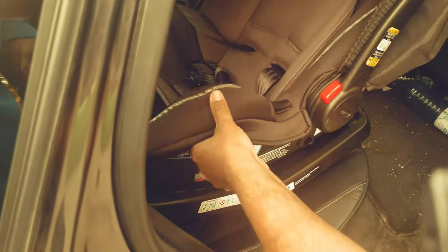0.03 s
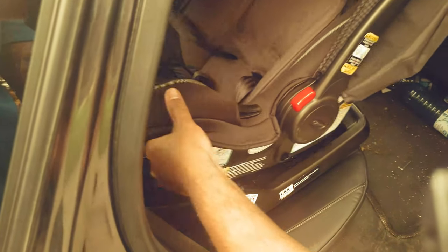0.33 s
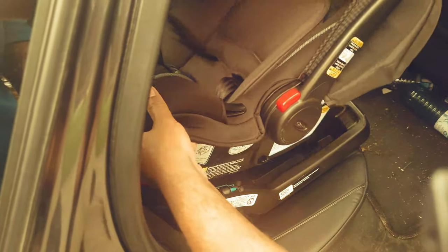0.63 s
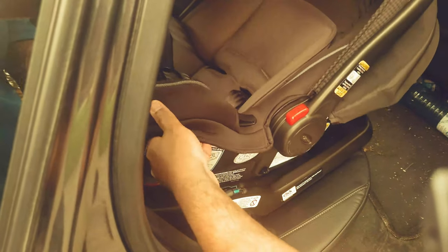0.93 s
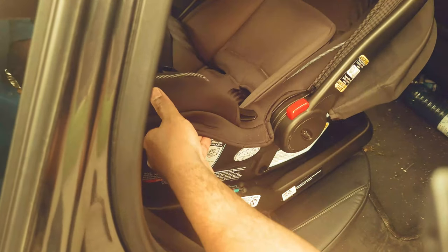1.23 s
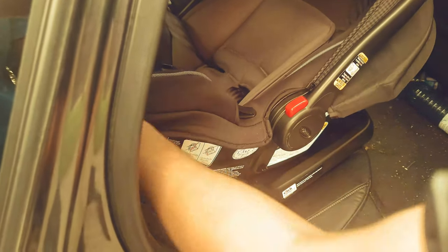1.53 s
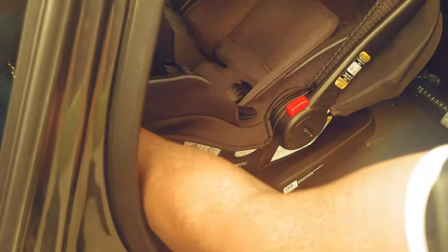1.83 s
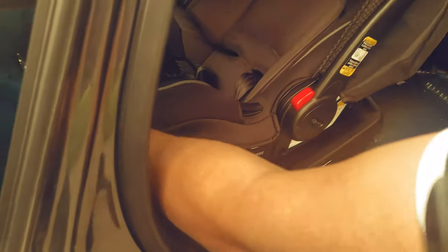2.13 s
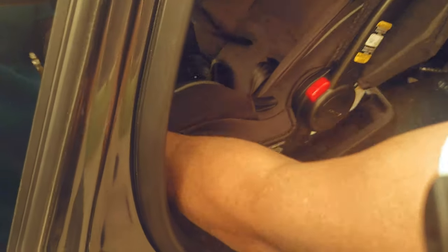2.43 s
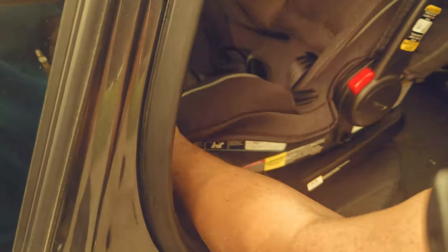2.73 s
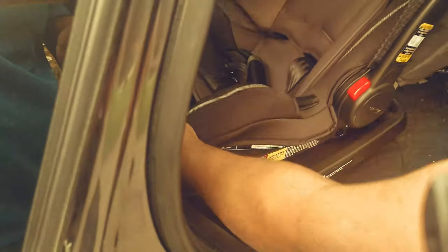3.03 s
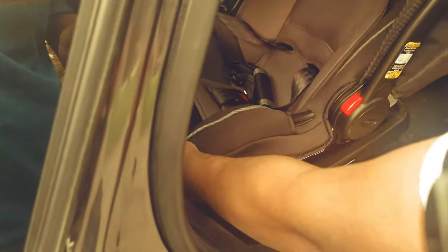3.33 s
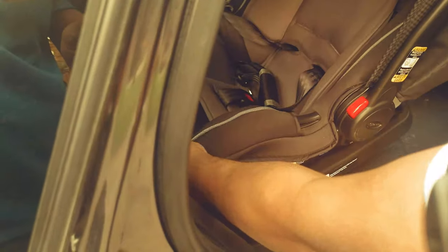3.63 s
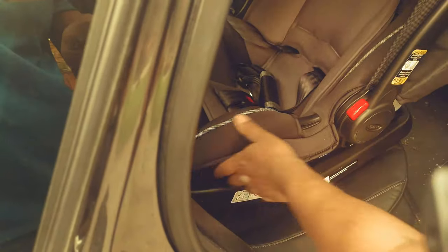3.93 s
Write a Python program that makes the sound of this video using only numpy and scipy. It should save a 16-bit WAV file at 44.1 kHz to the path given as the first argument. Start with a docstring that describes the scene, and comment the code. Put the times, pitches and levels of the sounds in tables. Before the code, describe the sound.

A plastic child seat is shoved about on its base close by in a parked car, knocking hollowly, rustling faintly, then clunking again and latching with a click. A low rumble, distant engine and faint birds come from outside.

```python
"""Child seat in a parked car

A plastic child seat is shoved about on its base, the car door open. Its hollow shell knocks,
scrapes and drops into place, a sprung latch snaps shut and fabric rustles; the cabin reflects it all.
Outside, over a low rumble, a distant engine drones, slowly rising in pitch.
A bird repeats a short song; farther birds whistle thinly."""
import sys
import numpy as np
from scipy import signal
from scipy.fft import rfft, irfft
from scipy.io import wavfile
from scipy.ndimage import uniform_filter1d

SR = 44100
rng = np.random.default_rng(int(sys.argv[2]) if len(sys.argv) > 2 else 0)


def to_wav(s):
    """Save 16-bit WAV."""
    ch = np.atleast_2d(s).T  # columns
    pcm = np.round(np.clip(ch, -1, 1) * 32767)  # PCM
    wavfile.write(sys.argv[1], SR, pcm.astype(np.int16))


N = 176400
T = np.arange(N) / SR

# Impact noise of shell and latch: f/Hz, relative density/dB
CRACK_SPECTRUM = [(300, -7), (900, 9.5), (2000, 14), (3300, 6.5), (5000, 3), (7500, 0), (9500, -7),
                  (15500, -12)]


def amp(db):
    """dB to gain."""
    return 10 ** (np.asarray(db) / 20)


def unit(x):
    """Scale to rms 1."""
    return x / np.sqrt(np.mean(x ** 2) + 1e-20)


def at_hz(points, hz):
    """Interpolate a table over log frequency."""
    f, value = np.transpose(points)
    return np.interp(np.log(hz + 1), np.log(f + 1), value)


def curve(points):
    """Interpolate a table over the scene's time."""
    return np.interp(T, *np.transpose(points))


def add(mix, start_s, sound):
    """Mix a sound in at start_s."""
    part = mix[:, max(round(start_s * SR), 0):][:, :sound.shape[-1]]
    part += sound[..., :part.shape[1]]


def colour(x, spectrum):
    """Shape the spectrum; rms 1."""
    size = x.shape[-1]
    gain = amp(at_hz(spectrum, np.fft.rfftfreq(size, 1 / SR)))
    return unit(irfft(rfft(x) * gain, size))


def drift(rate_hz, size):
    """Smooth random wander, rms about 1."""
    count = N if size > SR // 2 else SR // 2
    lowpass = np.exp(-(np.fft.rfftfreq(count, 1 / SR) / rate_hz) ** 2)
    return unit(irfft(rfft(rng.standard_normal(count)) * lowpass, count))[:size]


def pair(a, b, coherence, lag_s=0):
    """Two unrelated signals to stereo of given coherence; left lags."""
    hz = np.fft.rfftfreq(len(a), 1 / SR)
    same = np.clip(at_hz(coherence, hz), -1, 1)
    a, b = rfft(a), rfft(b)
    left = a * np.exp(-2j * np.pi * hz * lag_s)
    right = same * a + np.sqrt(1 - same ** 2) * b
    return irfft(np.array([left, right]))


def echoes(x, decay_times):
    """Diffuse reflections, separate per ear; decay_times: f/Hz, t60/s."""
    taps = rng.standard_normal((2, SR // 2)) * (T[:SR // 2] > .002)
    hz, t, bands = signal.stft(taps, SR, nperseg=128)
    fade = amp(-60 * t / at_hz(decay_times, hz)[:, None])
    tail = signal.istft(bands * fade, SR, nperseg=128)[1]
    return signal.fftconvolve(x, tail / np.linalg.norm(tail[0]), axes=1)[:, :N]


def decay(t, t60_s):
    """Exponential fall, 60 dB in t60_s."""
    return np.exp(-np.log(1000) * t / t60_s)


def ring(hz, t60_s, rise_s, lag_s=0):
    """One struck mode."""
    t = np.maximum(T[:SR // 4] - lag_s, 0)
    return np.sin(2 * np.pi * hz * t) * decay(t, t60_s) * (1 - np.exp(-t / rise_s))


def near_noise(spectrum, size):
    """Coloured stereo noise from the seat's position."""
    # Near field: f/Hz, left-right coherence
    coherence = [(200, 1), (900, 0.41), (2500, 0.39), (4500, 0.007), (15000, 0.091)]
    ears = pair(*rng.standard_normal((2, SR // 2)), coherence)
    return colour(ears, spectrum)[:, :size]


def engine(lag_s):
    """Harmonics of a far engine's firing rate swell and fade; the left ear lags."""
    # Firing rate: t/s, f/Hz
    firing = [(0, 81.6), (.3, 83.6), (.7, 84.5), (1, 85.63), (1.35, 87.87), (1.6, 87.9), (2, 89.27),
              (2.5, 93.03), (3, 94.14), (3.3, 97), (3.75, 97.73), (4, 99.4)]
    # Harmonics 1-4: t/s, then level/dB of each
    low_harmonics = [(0, -38.5, -37, -50.5, -76), (.15, -34.5, -39.5, -36.5, -72.5),
                     (.3, -43.5, -50, -48.5, -57), (.6, -41, -41, -47.5, -58.5),
                     (.78, -47, -52.5, -57, -64), (.93, -34.5, -41, -46, -47),
                     (1.08, -47, -40.5, -58.5, -51.5), (1.23, -38, -45.5, -46, -48),
                     (1.38, -43.5, -65, -49.5, -47), (1.55, -34.5, -47, -50, -59.5),
                     (1.72, -51, -38.5, -45.5, -50), (1.86, -34, -47, -42, -66),
                     (2.02, -46.5, -46, -49, -47), (2.25, -37, -42, -56, -72), (2.45, -36, -43.5, -45, -56),
                     (2.68, -36, -44.5, -51.5, -53), (3.04, -59, -48, -41.5, -64),
                     (3.36, -32, -48.5, -45.5, -54), (3.5, -45, -46, -42, -58.5),
                     (3.64, -28, -58, -40, -73), (3.75, -38, -51.5, -50.5, -60),
                     (3.9, -26.5, -32, -50, -53), (4, -29.5, -37, -44, -58)]
    # Upper harmonics: number, level/dB
    overtones = [(5, -60), (6, -67), (7, -77)]
    # Their common swell: t/s, gain/dB
    swell = [(0, -3), (1, -9), (1.8, 4.5), (2.6, 4.5), (3.3, -10.5), (4, -3)]
    hz = curve(firing) * (1 + 0.0035 * drift(9.28, N))
    cycles = np.cumsum(hz) / SR - np.array([[lag_s], [0]]) * hz
    times, *levels = np.transpose(low_harmonics)
    parts = [(k, uniform_filter1d(np.interp(T, times, amp(db)), size=1500))
             for k, db in enumerate(levels, 1)]
    parts += [(k, amp(db + curve(swell) + 6.5 * drift(4.3, N))) for k, db in overtones]
    return np.sqrt(2) * sum(gain * np.sin(2 * np.pi * k * cycles) for k, gain in parts)


def air(lag_s):
    """Outdoor rumble from the engine's side, thinning to faint hiss."""
    # Rumble and hiss: f/Hz, relative density/dB
    spectrum = [(15, -36.5), (30, -19), (50, -1), (80, -2), (135, 0), (230, -2.5), (330, -5.5),
                (450, -12.5), (700, -14), (1060, -21.5), (1600, -27), (2100, -39.5), (2900, -50),
                (4500, -56.5), (7300, -51), (9000, -59), (15500, -56.5)]
    # Slow swell: t/s, gain/dB
    swell = [(0, -2.5), (.7, 0.5), (1.5, -2), (2.1, -1), (2.5, 1.5), (2.9, -0.5), (3.5, 1.5), (4, 0.5)]
    # Outdoor field: f/Hz, left-right coherence
    coherence = [(60, .98), (180, 1), (550, 0.5), (1650, 0.5), (4000, 0.015), (15000, 0)]
    ears = pair(*rng.standard_normal((2, N)), coherence, lag_s)
    level_db = -41 + curve(swell) + 1.3 * drift(12, N)
    balance_db = [[.2], [-.2]]
    return colour(ears, spectrum) * amp(level_db) * amp(balance_db)


def birds():
    """Slurred song notes and thin wavering whistles, echoing outdoors."""
    # Songs: t/s, gain/dB
    songs = [(0.029, -1.6), (3.2, 3.6)]
    # Notes of a song: offset/s, length/s, start f/Hz, end f/Hz, level/dB
    notes = [(0, .05, 2500, 2410, -68.5), (0.038, 0.029, 2480, 2110, -61.5),
             (0.125, 0.099, 2100, 2450, -70), (0.191, 0.043, 2850, 2390, -59),
             (0.554, 0.058, 3127, 3078, -56.5), (.585, 0.03, 2970, 2590, -61.5),
             (0.611, 0.046, 2950, 3010, -57), (0.646, 0.1, 3800, 3660, -72),
             (0.686, 0.023, 3020, 3000, -59.5), (1.052, 0.041, 3010, 2970, -67)]
    # Farther birds: t/s, length/s, f/Hz, level/dB
    whistles = [(.24, 0.41, 6880, -80), (.37, 0.3, 5250, -80), (1.08, 0.26, 4250, -81.5),
                (1.25, 0.14, 5223, -73), (2.24, .34, 7760, -79), (2.27, 0.3, 6970, -79.5),
                (2.37, 0.26, 4330, -81), (2.61, 0.094, 5550, -82)]
    song_waver_hz, whistle_waver_hz = 55, 245
    out = np.zeros((2, N))
    for start_s, song_db in songs:
        for offset_s, length_s, from_hz, to_hz, db in notes:
            u = np.arange(0, 1, 1 / (length_s * SR))
            hz = from_hz + (to_hz - from_hz) * u + song_waver_hz * drift(200, len(u))
            tone = np.sin(2 * np.pi * np.cumsum(hz) / SR)
            add(out, start_s + offset_s, amp(song_db + db) * np.sin(np.pi * u) * tone)
    for start_s, length_s, centre_hz, db in whistles:
        u = np.arange(0, 1, 1 / (length_s * SR))
        hz = centre_hz + whistle_waver_hz * drift(300, len(u))
        tone = np.sin(2 * np.pi * np.cumsum(hz) / SR)
        add(out, start_s, amp(db) * np.sqrt(abs(np.sin(np.pi * u))) * tone)
    return amp(-3) * (out + echoes(out, [(2000, 0.45), (8000, 0.28)]))


def knock(thump_db, body_db, edge_db, crack_db, pitch_ratio):
    """A blow rings the shell's low modes; a noise crack stands for the dense high ones."""
    # Hollow shell modes: f/Hz, level/dB, t60/s, left minus right/dB
    modes = [(173, -10, 0.12, 8), (200, -5, 0.094, -10.5), (257.6, -11.5, 0.073, -1.5),
             (301.5, -3.5, 0.075, 5), (430, -10.5, 0.067, -14), (527.4, -9, 0.048, 4.5),
             (624, -4.5, 0.036, -3), (712, -3, 0.033, -3), (863, 0, 0.018, -11.5),
             (1018, -4.5, 0.061, -4.5), (1315, -4, 0.023, -10.5), (1520, -11.5, .03, 3.5),
             (1780, -11, 0.021, -2), (2440, -16.5, 0.027, 0), (2800, -18.5, 0.029, 2.5),
             (3206, -21.5, .04, 2)]
    contact_s, left_lag_s, crack_rise_s = 0.001, 0.000078, 0.0016
    blow = [(278, thump_db), (576, body_db), (930, body_db), (1020, edge_db)]  # f/Hz, level/dB
    shell = 0
    for k, (hz, db, t60_s, pan_db) in enumerate(modes):
        left = amp(pan_db / 2) * ring(hz * pitch_ratio, t60_s, contact_s, left_lag_s)
        right = amp(-pan_db / 2) * ring(hz * pitch_ratio, t60_s, contact_s)
        polarity = (-1) ** (k // 2)
        shell = shell + polarity * amp(db + at_hz(blow, hz)) * np.array([left, right])
    t = T[:SR // 4]
    rise = 1 - np.exp(-t / crack_rise_s)
    fade = decay(t, t60_s=0.036) + amp(-16.5) * decay(t, t60_s=0.23)
    return shell + amp(crack_db) * rise * fade * near_noise(CRACK_SPECTRUM, len(t))


def rub(length_s, spectrum, grain_db, peak_fraction):
    """Friction: tiny slips bunch unevenly under one swelling stroke."""
    u = np.arange(0, 1, 1 / (length_s * SR))[:SR // 2]
    slips = near_noise(spectrum, len(u)) * amp(grain_db * drift(180, len(u)))
    return unit(slips) * np.interp(u, [0, peak_fraction, 1], [0, 1, 0])


def scrape(length_s):
    """Plastic slides on plastic."""
    # Plastic friction: f/Hz, relative density/dB
    spectrum = [(200, 14), (700, 5.5), (1200, 1.5), (2000, -8), (3200, -22.5), (5000, -19.5), (8000, -41),
                (15500, -36)]
    return rub(length_s, spectrum, grain_db=-1.0, peak_fraction=.4)


def rustle(length_s):
    """Fabric rubs with a grainy hiss."""
    # Fabric friction: f/Hz, relative density/dB
    spectrum = [(500, 12), (2000, -6), (4500, -3.5), (7500, -3.5), (9500, -10), (15500, -13)]
    return rub(length_s, spectrum, grain_db=1.5, peak_fraction=0.25)


def latch_snap():
    """The sprung catch hits its stop: a bright tick and a short ring."""
    # Latch modes: f/Hz, level/dB, t60/s
    modes = [(854, 15.5, .03), (1430, -3.5, 0.026), (2050, -19, 0.022), (2722, -5, 0.022),
             (3021, -6.5, 0.027), (3480, -2.5, 0.036), (3720, -1, 0.017), (4060, -20, 0.023),
             (4500, -2, 0.014), (4880, -13.5, 0.063), (5200, -5.5, 0.031), (6260, -7, 0.024),
             (7970, -12, 0.029)]
    # Latch balance: f/Hz, left minus right/dB
    balance = [(900, -4.5), (1500, -16.5), (2500, -3), (4500, -4), (6500, -11)]
    t, sides = T[:SR // 4], np.array([[.5], [-.5]])
    metal = 0
    for hz, db, t60_s in modes:
        gain = amp(db + sides * at_hz(balance, hz))
        metal = metal + gain * ring(hz * rng.uniform(0.93, 1.01), t60_s, rise_s=0.00015)
    tick = near_noise(CRACK_SPECTRUM, len(t)) * decay(t, t60_s=0.043)
    return amp(-7.5) * metal + amp(-6.5) * tick


def seat():
    """Direct sound of the seat shoved about on its base."""
    # Shell hits base: t/s, thump/dB, hollow body/dB, hard edge/dB, crack/dB, pitch ratio
    knocks = [(0.178, -42, -48, -49.5, -70, 1.35), (.217, -31.5, -38.5, -52, -65, 1.1),
              (.549, -33, -37, -47, -64, .9), (.791, -26.5, -23, -50, -53, 1.04),
              (.797, -22, -36.5, -31, -48.5, 1.05), (.909, -40, -39.5, -46, -71, 1.07),
              (0.9607, -15.5, -15, -33, -35, 1.13), (0.972, -51, -32, -28, -36.5, 1.13),
              (.983, -32, -22.5, -40, -33.5, 1.58), (.9945, -22.5, -19.5, -26.5, -42, 0.97),
              (1.016, -33, -25.5, -58, -49, 1.53), (1.082, -48, -41, -68, -55, 0.73),
              (1.467, -42, -41, -51.5, -58, 1.62), (2.744, -41, -49, -48, -75, 1.12),
              (2.941, -38.5, -40, -51, -73, 1.3), (2.956, -23, -46, -68, -63, 1.027),
              (3.002, -33.5, -38, -51, -61, 1.22), (3.0697, -25, -18.5, -34, -49, 0.97),
              (3.078, -19, -37, -23, -43.5, 0.79), (3.098, -16, -8, -12.5, -32.5, 1),
              (3.109, -16.5, -52, -22.5, -44, 1.21), (3.126, -30, -53, -30, -65.5, 0.66),
              (3.284, -31.5, -31.5, -43, -47, 1.1), (3.302, -30.5, -34.5, -47, -45.5, 1.23),
              (3.324, -27.5, -26.5, -23, -38.5, 0.91), (3.3613, -24, -13, -55, -38.5, 0.95),
              (3.377, -16.5, -35, -49, -65, 1), (3.5175, -26.5, -20.5, -28.5, -42.5, 0.91),
              (3.549, -32.5, -28.5, -37, -45.5, 1.15)]
    # Latch impacts: t/s, level/dB
    snaps = [(3.3606, -26), (3.3646, -20.5), (3.3668, -29.5)]
    # Plastic strokes: t/s, length/s, level/dB
    scrapes = [(0.967, 0.056, -34.5), (3.281, 0.05, -33.5), (3.323, 0.033, -28), (3.522, 0.076, -37)]
    # Fabric strokes: t/s, length/s, level/dB
    rustles = [(1.456, 0.17, -54), (1.622, 0.26, -68), (1.713, 0.075, -61), (1.791, 0.11, -54.5),
               (2.931, 0.17, -70), (3.402, 0.23, -66), (3.841, 0.44, -61.5)]
    out = np.zeros((2, N))
    for start_s, *blow in knocks:
        add(out, start_s, knock(*blow))
    for start_s, db in snaps:
        add(out, start_s, amp(db) * latch_snap())
    for start_s, length_s, db in scrapes:
        add(out, start_s, amp(db) * scrape(length_s))
    for start_s, length_s, db in rustles:
        add(out, start_s, amp(db) * rustle(length_s))
    return out


def cabin(direct):
    """Direct sound plus the cabin's short reflections."""
    # Cabin decay: f/Hz, t60/s
    decay_times = [(100, .16), (500, 0.088), (1500, 0.18), (5000, 0.087), (15000, 0.23)]
    # Reflected field: f/Hz, left-right coherence
    coherence = [(150, 1), (400, 0.77), (1000, .3), (3000, 0)]
    return direct + amp(-9.5) * pair(*echoes(direct, decay_times), coherence)


def scene():
    """The seat close by, the outdoors behind it."""
    outside_lag_s = 0.0004
    return cabin(seat()) + engine(outside_lag_s) + air(outside_lag_s) + birds()


def record(dry):
    """Low-pass at 15.8 kHz."""
    lowpass = signal.firwin(511, 15800, window=("kaiser", 9), fs=SR)
    return signal.oaconvolve(dry, lowpass[None], "same")


dry = scene()
out = record(dry)
to_wav(out)
```